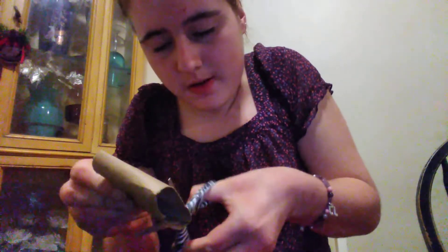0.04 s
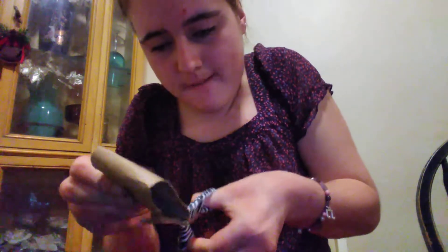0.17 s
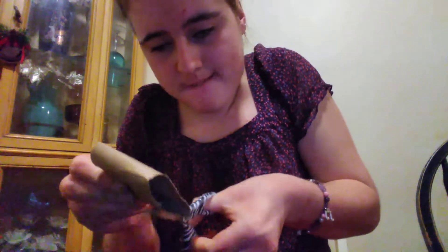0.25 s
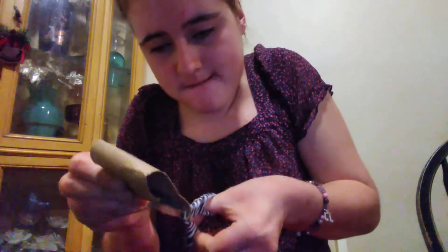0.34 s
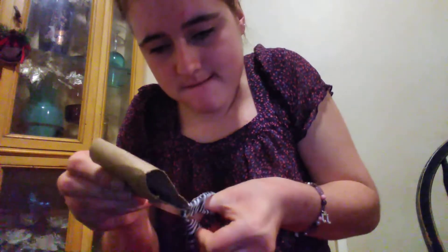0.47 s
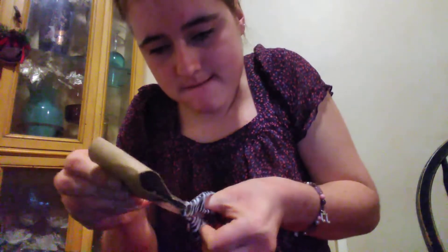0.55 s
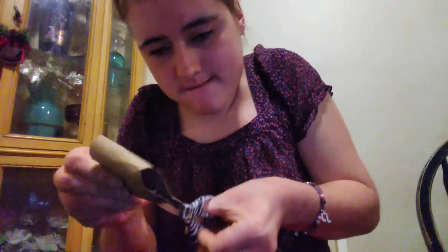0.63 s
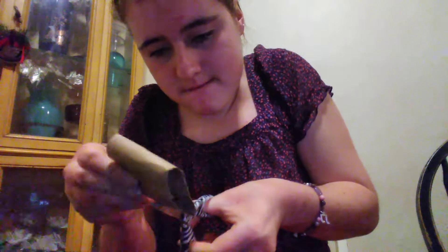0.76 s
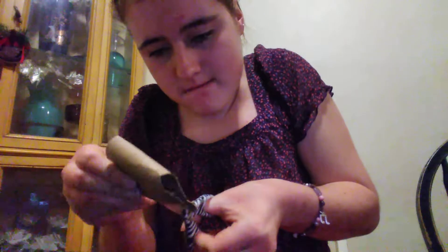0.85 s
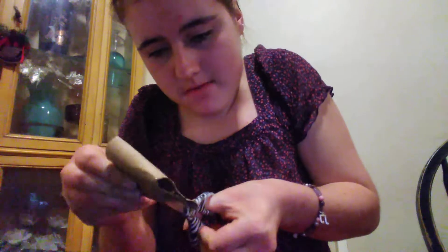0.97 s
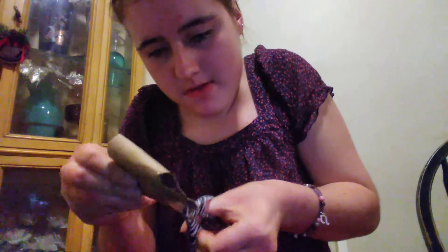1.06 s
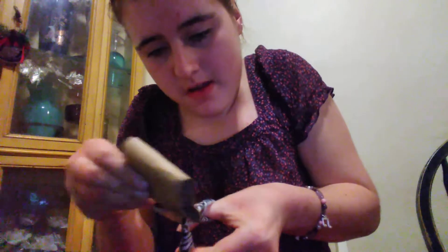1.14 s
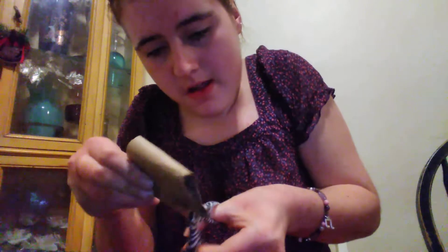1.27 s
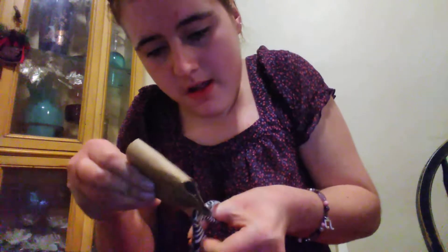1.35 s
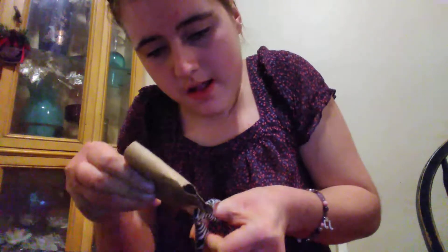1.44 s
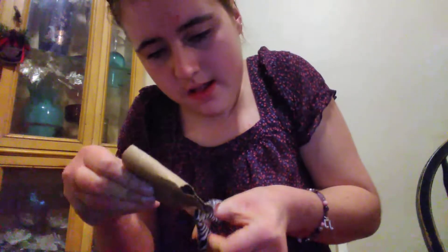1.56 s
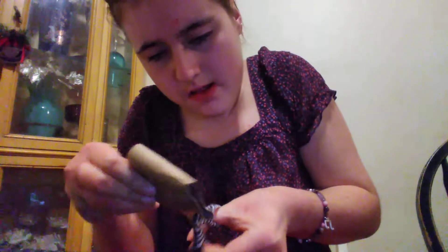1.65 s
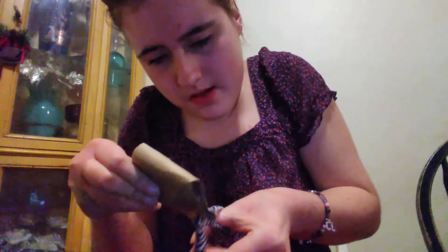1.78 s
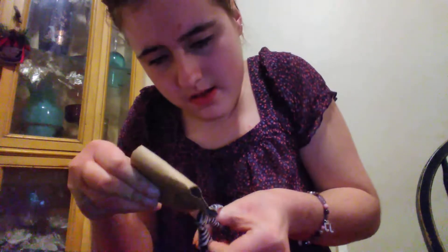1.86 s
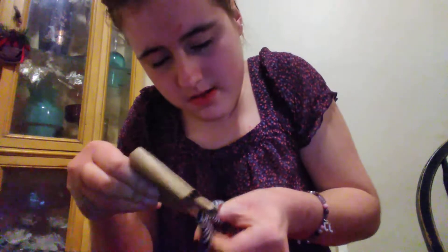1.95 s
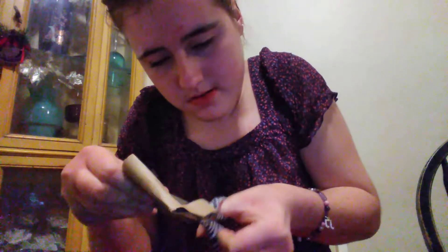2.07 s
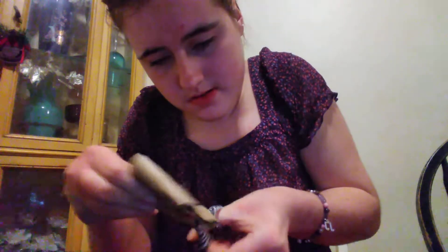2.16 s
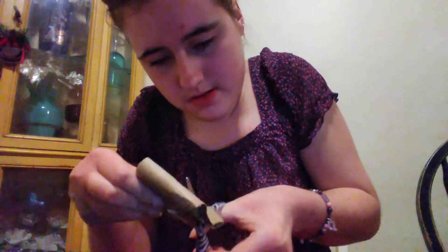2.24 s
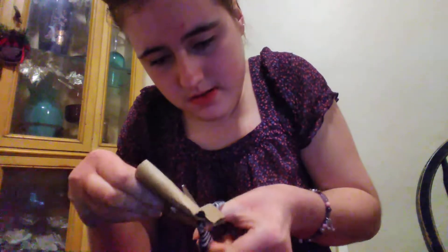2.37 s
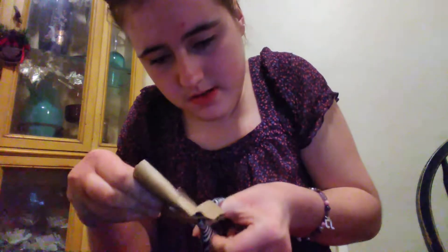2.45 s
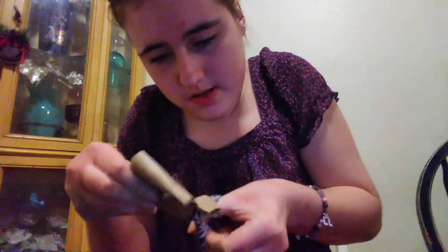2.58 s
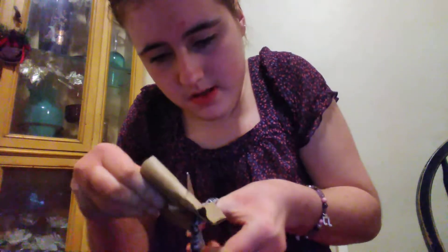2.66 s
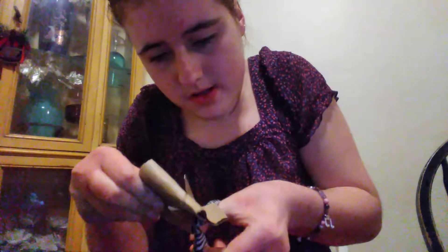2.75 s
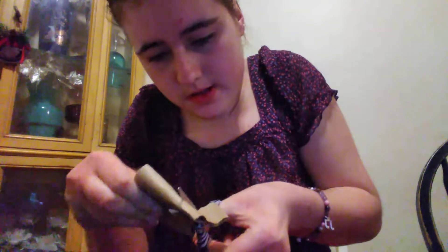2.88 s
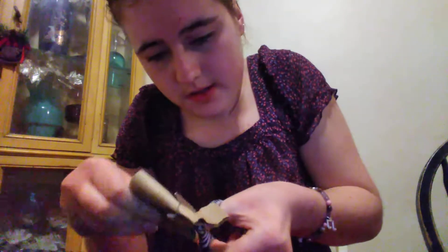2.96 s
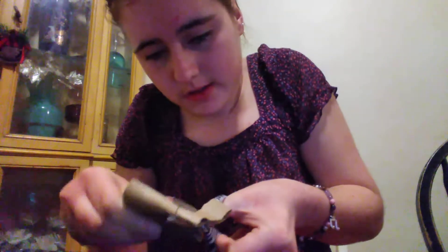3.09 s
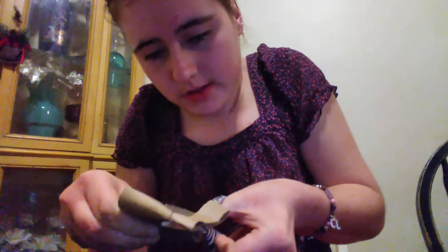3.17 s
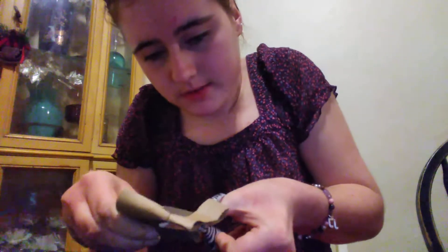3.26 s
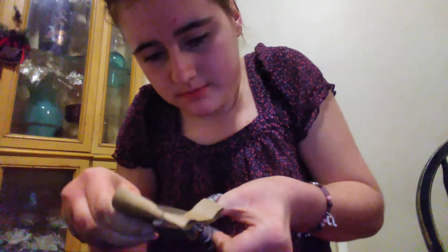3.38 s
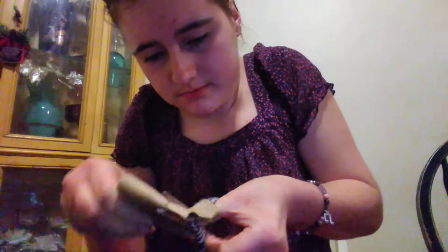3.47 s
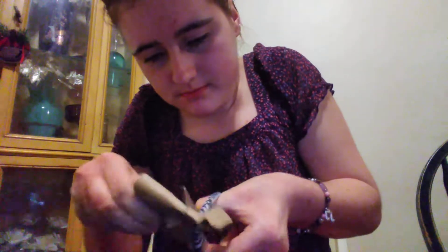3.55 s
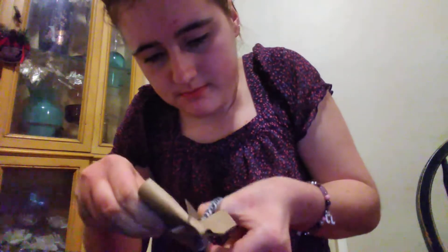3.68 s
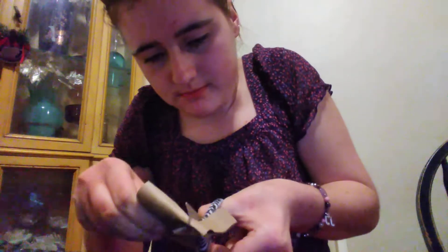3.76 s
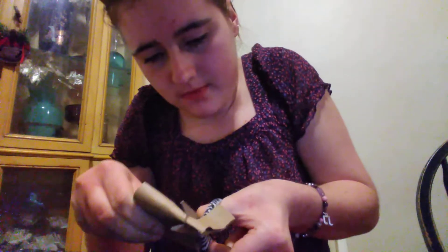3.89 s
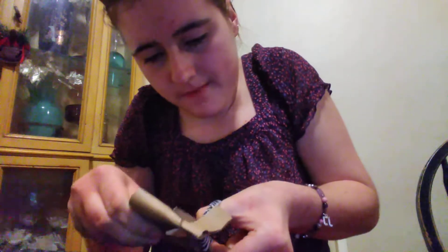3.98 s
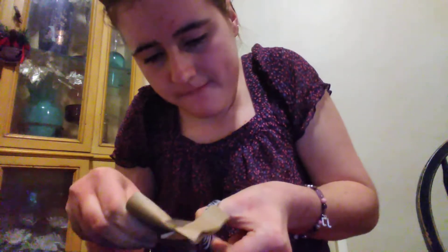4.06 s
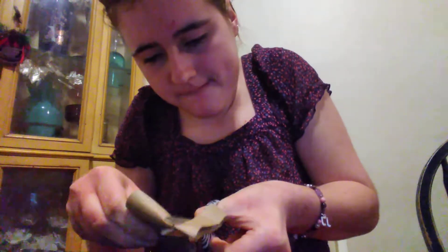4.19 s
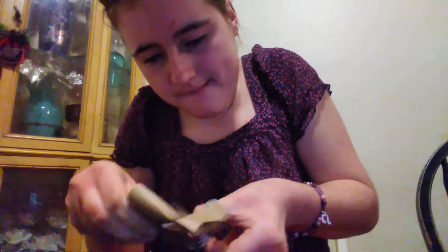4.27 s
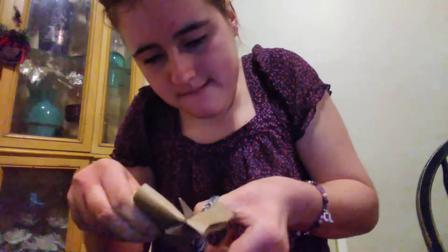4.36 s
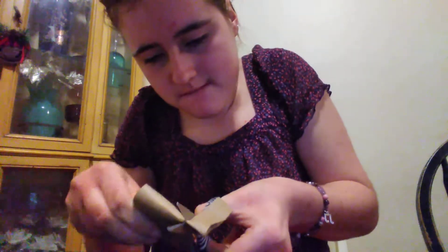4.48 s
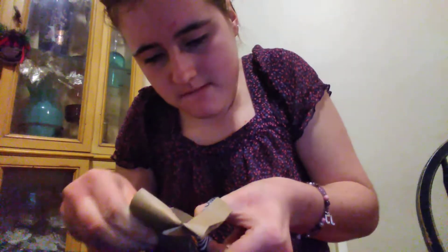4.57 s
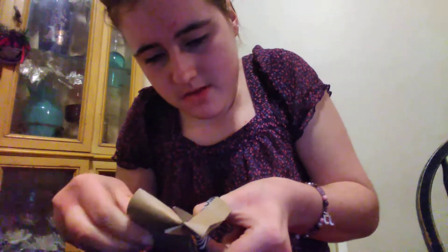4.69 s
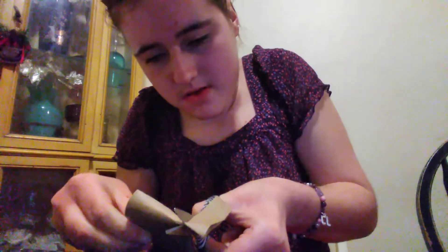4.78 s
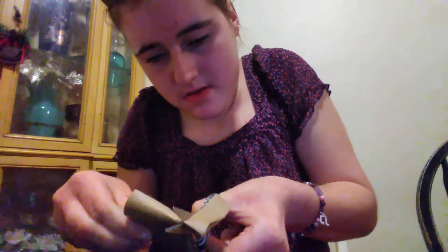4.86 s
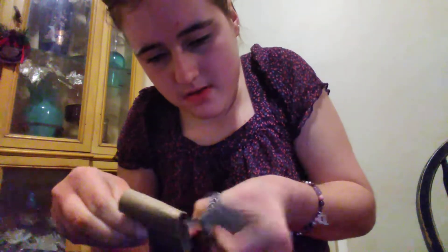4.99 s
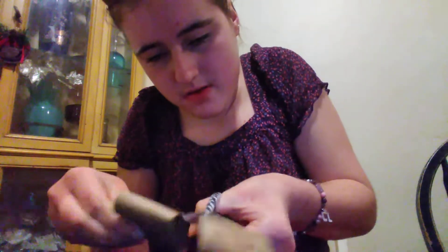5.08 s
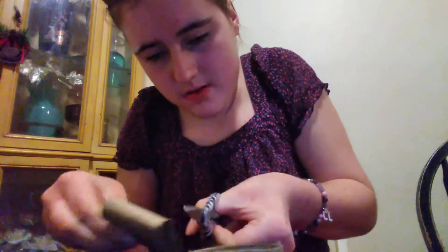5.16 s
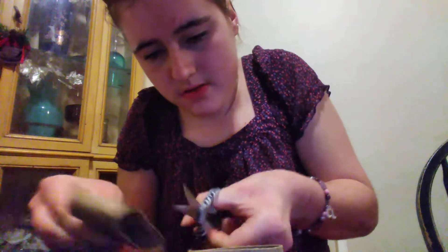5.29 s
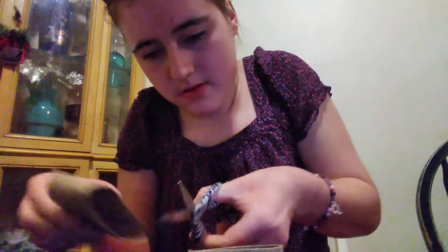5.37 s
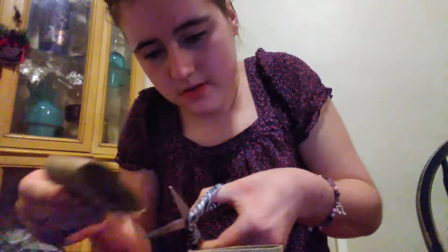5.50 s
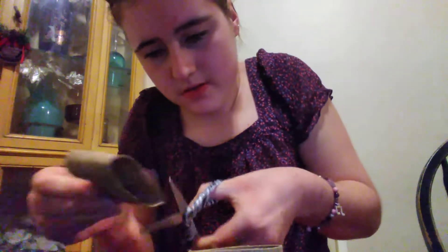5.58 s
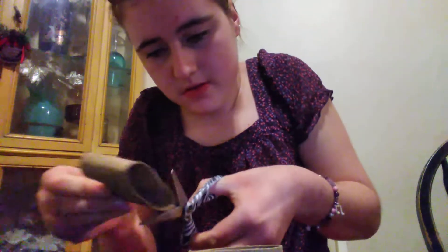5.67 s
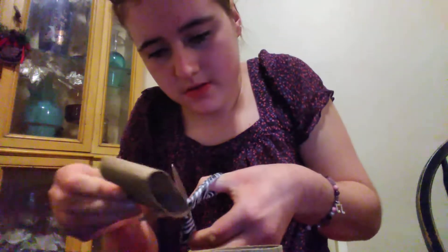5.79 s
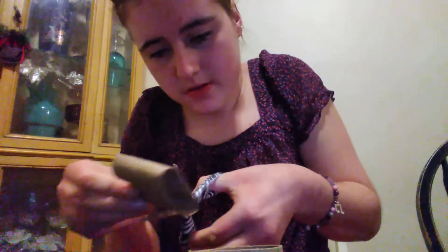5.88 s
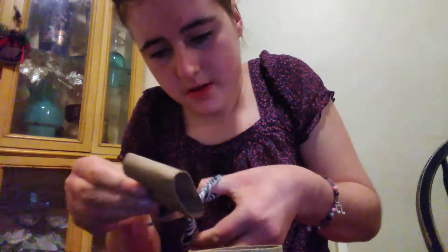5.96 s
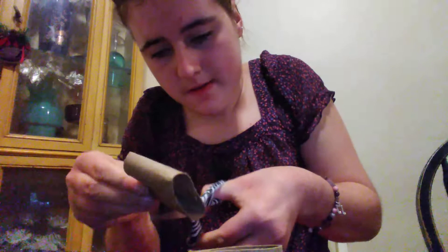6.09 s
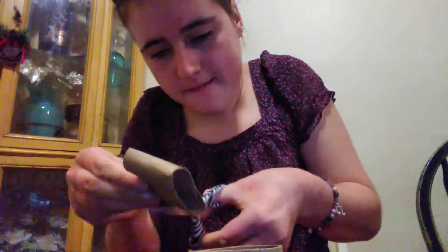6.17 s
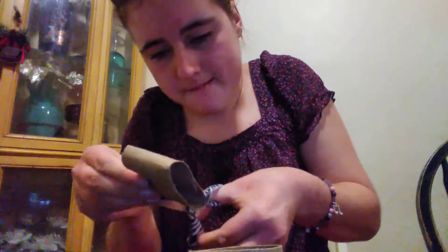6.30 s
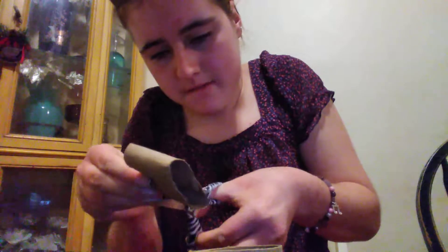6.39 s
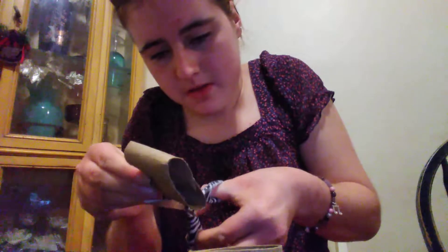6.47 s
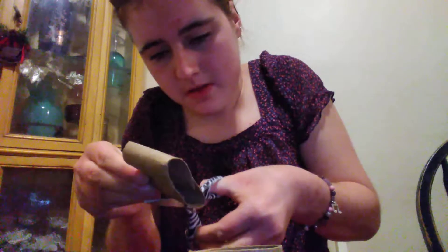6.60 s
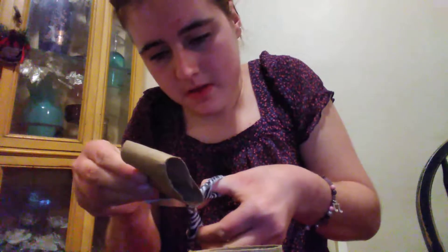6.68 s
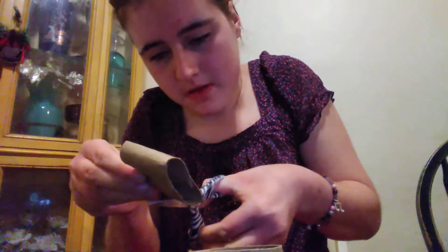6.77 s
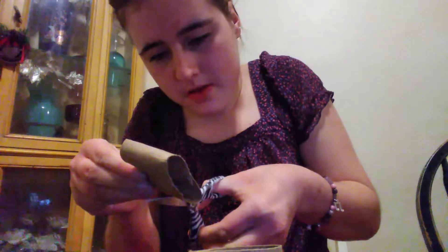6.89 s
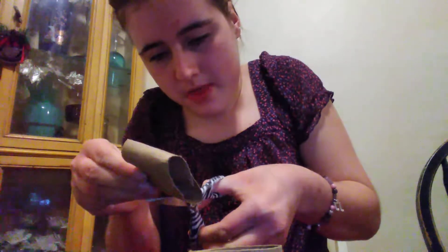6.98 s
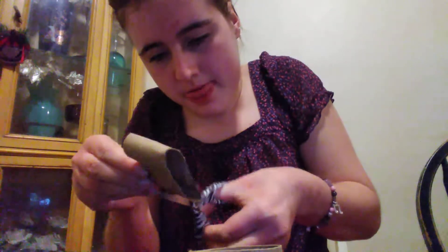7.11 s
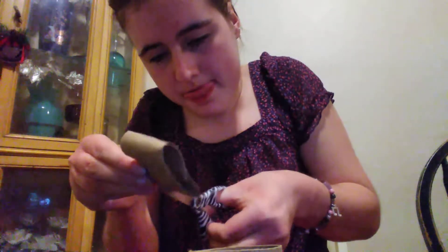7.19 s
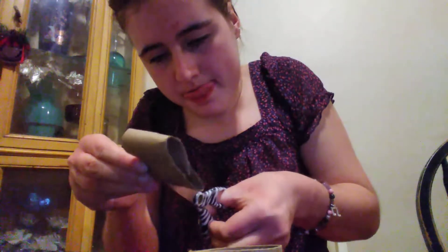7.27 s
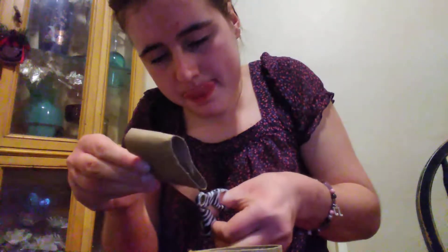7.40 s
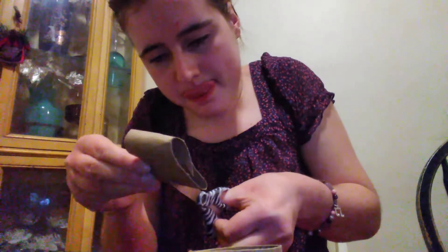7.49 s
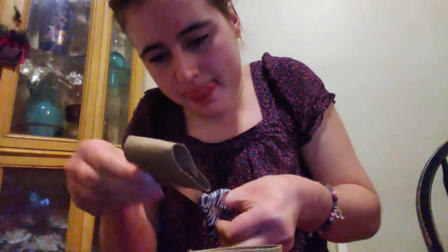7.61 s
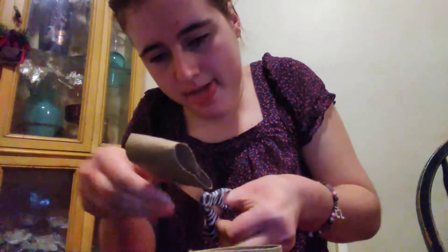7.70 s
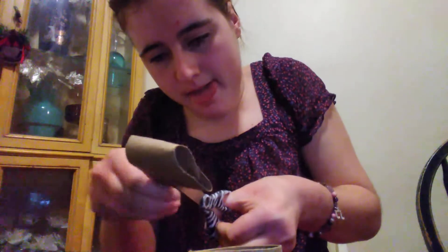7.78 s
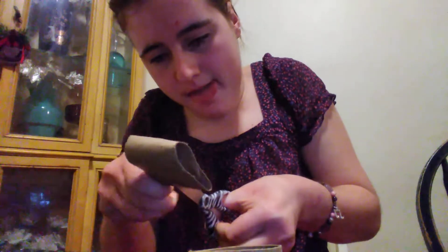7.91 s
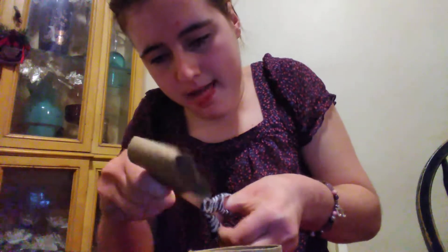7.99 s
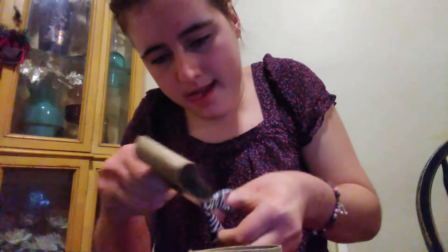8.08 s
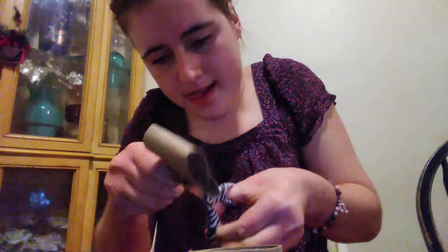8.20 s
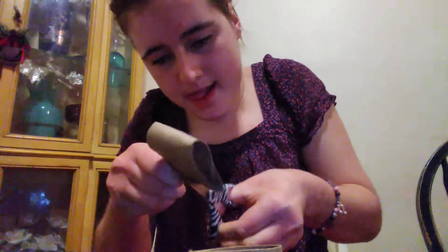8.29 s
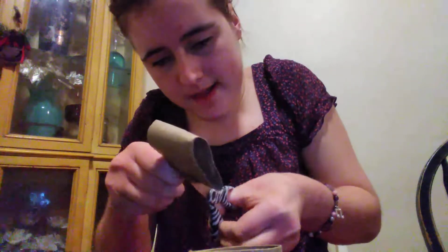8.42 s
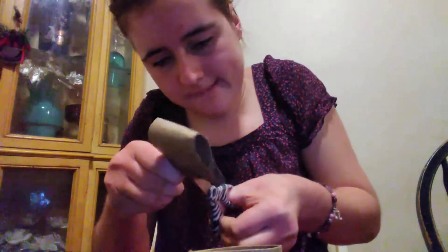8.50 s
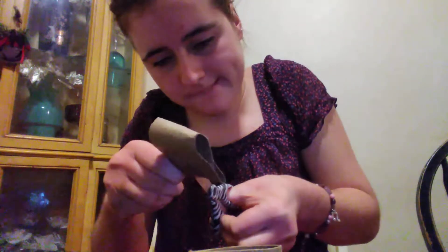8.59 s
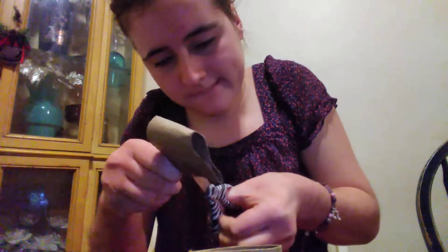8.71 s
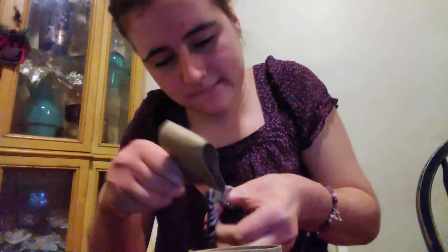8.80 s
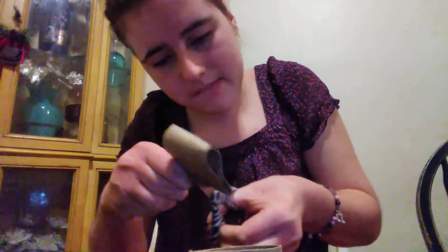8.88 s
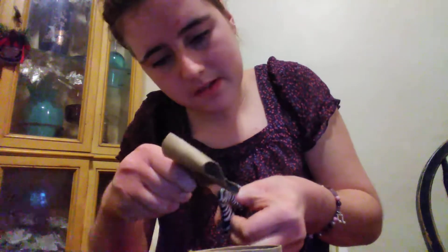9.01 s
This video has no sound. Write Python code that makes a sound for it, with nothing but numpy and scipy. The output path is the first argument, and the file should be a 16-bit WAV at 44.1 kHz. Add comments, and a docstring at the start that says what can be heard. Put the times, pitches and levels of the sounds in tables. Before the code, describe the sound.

Scissors cut a cardboard tube close to the microphone in a quiet room, over a faint murmur of air. From about 0.5 seconds, short snips come in a quick, uneven run, each a dry crackle of tearing fibres, often with a sharp, slightly hollow snap. A strong snap lands at 2 seconds. After 3 seconds the cuts spread out, falling near 3.5, 4, 4.3 and 5 seconds. Fingers and blades slide softly on the cardboard between them. The cutting then stops, and the background drops out in patches until about 5.8 seconds. Faint handling returns, with two softer snips near 6.7 and 7.1 seconds. Another cut comes just after 8 seconds, followed by a louder cluster of crisp crunches from 8.5 to 9 seconds.

```python
"""Scissors chew through a cardboard tube, close to a microphone pair in a quiet room.
Fibres tear in dense crackle and give way in snaps; both ring the modes of the tube.
Hands rustle between cuts over faint room air. The recorder widens the stereo by
cross-feeding, and the sound drops out now and then."""
import sys
import numpy as np
from scipy import signal
from scipy.fft import rfft, irfft
from scipy.io import wavfile
from scipy.ndimage import uniform_filter1d

SR = 44100
rng = np.random.default_rng(int(sys.argv[2]) if len(sys.argv) > 2 else 0)


def wav_out(sig):
    """Save sig, one row per channel (or a flat mono array), as 16-bit PCM at SR to the path in sys.argv[1]."""
    wavfile.write(sys.argv[1], SR, np.round(np.clip(np.atleast_2d(sig).T, -1, 1) * 32767).astype(np.int16))


N = 399105
TIME_S = np.arange(N) / SR
FREQ_HZ = np.fft.rfftfreq(N, 1 / SR)

# Blade squeezes. Each row: bite in seconds, length in ms, tearing at bite and at end in dB,
# body, wall and fibre in dB re tearing, wall focus in Hz, tearing focus in Hz.
SQUEEZES = [(0.530, 43.3, -31, -34.5, -14, -14, -1.5, 1050, 4000),
            (0.697, 41, -37.5, -37, -8.5, -6.5, 5.5, 1420, 5250),
            (0.731, 23, -33, -37, -11.5, -0.5, -4, 1488, 3320),
            (0.851, 8, -51, -57.5, 5.5, 3.5, 13, 1230, 5430),
            (0.909, 24, -27.5, -27, -26, -5, 0, 1380, 4300),
            (1.109, 21, -49, -56, -8, -12, 4.5, 1440, 4750),
            (1.132, 42.7, -30, -34, -11, -7, 1.5, 1480, 4350),
            (1.318, 2, -37.5, -46.5, -1.5, -12, 8.5, 1370, 5400),
            (1.382, 6, -23.5, -30, -12.5, -8.5, 2, 1090, 5100),
            (1.412, 20, -46.5, -40.5, -10, 2, 4, 1450, 4610),
            (1.446, 24, -32, -42.5, -8, 1, -1, 1350, 4620),
            (1.664, 9, -44.5, -41.5, -4.5, -5, 6, 1430, 5180),
            (1.697, 10, -40, -40.5, -10, -5, 3, 1510, 4841),
            (1.971, 20, -25.5, -33.5, -24, 3.5, -1.5, 1080, 4430),
            (2.005, 36, -37.5, -40.5, -14, 3, 1.5, 1280, 4350),
            (2.170, 22, -47.5, -27.5, -10, 4, -2, 1200, 4200),
            (2.200, 32, -37, -44, -17, -8.5, 0.5, 1210, 3950),
            (2.430, 34, -40, -37.5, -11.5, -3, -6, 1660, 4500),
            (2.474, 26, -29.5, -42, -11.5, -0.5, -3.5, 1740, 4350),
            (2.634, 30, -40.5, -38.5, -10, 2, 3, 1270, 4880),
            (2.804, 20.7, -38.5, -42, -8, -4.5, 6.5, 1500, 5260),
            (2.890, 34, -30.5, -52, -2.5, -2.5, 2, 1620, 3530),
            (3.072, 40, -34.5, -49, -8.5, -12.5, 3.5, 850, 5140),
            (3.522, 14, -40.5, -32.5, -10.5, -4.5, 1.5, 1230, 4050),
            (3.538, 33, -28.5, -30.5, -14, -4, -1.5, 1250, 3900),
            (4.042, 11, -32.5, -34, -8, 3, 3.5, 1250, 4890),
            (4.065, 17, -31.5, -35.5, -12.5, -1.5, 4, 1450, 4050),
            (4.296, 22, -35, -30.5, -18, -3.5, 0.5, 1400, 5280),
            (4.322, 42, -31.5, -39, -14, -11, 0, 1370, 5360),
            (4.955, 7.6, -43, -21, -18.5, -6, 5.5, 620, 4800),
            (4.990, 38, -51, -54.5, -5, -3.5, 5.5, 610, 4800),
            (6.690, 27, -59, -63, -7, 1.5, 0, 1400, 3200), (6.726, 2, -41.5, -40, -8, -3, 1.5, 1420, 3240),
            (7.064, 52, -72.5, -57, -5, -8, -3.5, 1208, 3430),
            (7.122, 46.7, -37, -42.5, -2, -7.5, -1.5, 1410, 3550),
            (7.190, 37, -55.5, -71, 4.5, -3, -8.5, 759, 3490),
            (8.072, 47.4, -48, -51, -4, 0.5, 1.5, 1600, 3300),
            (8.140, 160, -62, -67, -3, 3.5, -22, 1600, 3180),
            (8.310, 63, -61.5, -64.5, -16, -9.5, -25, 1340, 2820),
            (8.476, 30.3, -26, -45, -6, 3.5, 0.5, 1210, 3300),
            (8.581, 31.7, -31, -47.5, -5.5, -10, -0.5, 1380, 4900),
            (8.768, 14.3, -38, -27.5, -13, -3, -2.5, 1280, 2970),
            (8.790, 32, -30.5, -39, -13, -10.5, -2.5, 1250, 3120),
            (8.948, 34, -29, -34.5, -12, -6.5, 2, 1250, 4000),
            (8.985, 62, -33, -50.5, -21.5, -9, 0.5, 1260, 4900)]
# The card gives way. Each row: start in seconds, tearing peak in dB,
# body, wall and fibre in dB re tearing, wall focus in Hz, tearing focus in Hz.
CARD_SNAPS = [(0.5267, -26.5, -30, -3, 2.5, 571, 3500), (0.5336, -19, -35, -3, -7, 620, 3300),
              (0.5446, -13, -28, -3.5, -0.5, 1380, 5520), (0.5577, -21.5, -36, -7.5, -9, 650, 4060),
              (0.5676, -19.5, -37, -7.5, -1, 1560, 3560), (0.7324, -23, -40, -16, -23, 1550, 3210),
              (0.9103, -17, -12, -19, 7.5, 1438, 6040), (0.9278, -19, -69, -28, -3.5, 1340, 5200),
              (1.1347, -17.5, -27, -14, -4, 1470, 3980), (1.1644, -26.5, -7, -22, -18, 552, 5040),
              (1.318, -33, -23.5, -6.5, 13, 1470, 5460), (1.3842, -15, -37.5, -9.5, -1, 870, 5510),
              (1.4263, -18, -21.5, -20, -10.5, 1560, 4150), (1.4444, -14.5, -13, -5.5, 1.5, 930, 5150),
              (1.694, -26, -15.5, -7.5, -17, 1710, 5680), (1.9692, -6.5, -17, 2, -9, 930, 3990),
              (1.9819, -9, -43.5, 1, -1.5, 1580, 5130), (2.027, -29, -29, -25, 2, 1600, 3170),
              (2.1912, -35, -43, -0.5, 2, 1247, 5290), (2.4321, -17, -21, -0.5, -6.5, 1550, 4050),
              (2.4737, -19, -23, 2.5, 3, 1784, 5080), (2.6531, -25.5, -13, 3.5, -5, 1100, 5600),
              (2.8176, -23, -19, -23, 1, 1517, 5240), (2.887, -19, -21, 0, 3.5, 1650, 3110),
              (3.0715, -18, -27, -17, -2.5, 628, 5400), (3.5345, -28.5, -29, 7, -17, 1170, 3170),
              (3.5475, -33, -33, 8.5, -15, 1310, 3183), (4.04, -11.5, -28, 0, 0.5, 1270, 5230),
              (4.07, -27, -21.5, -5, -18.5, 1367, 3640), (4.312, -21, -35.5, -19.5, -14.5, 1090, 5560),
              (4.9683, -11, 0.5, -4, -7, 558.6, 5610), (6.7236, -40, -33, 3, -15, 1380, 3000),
              (7.1229, -35.5, -30, -3.5, -8, 1486, 2930), (8.0598, -25.5, -15, 7, -20.5, 1804, 2990),
              (8.0852, -33, -32.5, 13, -23, 1730, 3360), (8.4741, -14, -32, 5.5, -11, 1150, 2760),
              (8.4836, -15.5, -13, 0.7, 0, 740, 3250), (8.579, -26, -33, 5.5, -16, 1630, 5100),
              (8.7743, -19.5, -45, -1, -12, 1430, 2800), (8.952, -15.5, -21.5, -2.5, 6.5, 1250, 2700),
              (8.9754, -7.5, -29, -6, 5.5, 1030, 5420)]
# Tube and blade modes in four groups: hollow body, wall, tearing, fine fibre.
# Each row: frequency in Hz, width in Hz, level in dB.
MODE_GROUPS = [
    [(69.5, 11, -24), (140, 32, -21), (227, 96, -12.5), (306, 130, -6.5), (464.4, 120, -4)],
    [(612, 110, -6.5), (751.5, 170, -5.5), (937, 180, -5), (1254, 240, 0.5), (1435, 230, 0.5),
     (1738, 230, 1.5)],
    [(2476, 350, 4), (3022, 380, 2), (3510, 270, -4), (4057, 800, -0.5), (4870, 800, -2.5), (5204, 700, 1)],
    [(6120, 770, -3), (7200, 930, -1), (10140, 2400, -1), (11980, 2400, -2), (13800, 3900, -7.5)],
]


def undb(db):
    return 10 ** (np.asarray(db) / 20)


def walk(rate_hz):
    """Smoothed random steps, spread near 1."""
    hold = int(SR / rate_hz)
    steps = np.repeat(rng.standard_normal(N // hold + 1), hold)
    return 1.3 * uniform_filter1d(uniform_filter1d(steps, hold), hold)[:N]


def crackle(scatter_db, grain_s):
    """Uneven grain gains, rms 1."""
    hold = max(int(grain_s * SR), 1)
    grain_db = scatter_db * np.minimum(rng.exponential(size=N // hold + 1), 3)
    gain = np.repeat(undb(grain_db), hold)[:N]
    return gain / np.sqrt(np.mean(gain ** 2))


def swell(start_s, end_s, start_db, end_db, rise_db_per_s, fall_db_per_s):
    """Gain that climbs to start_db, slides to end_db and falls away."""
    knots_s = [start_s - 60 / rise_db_per_s, start_s, end_s, end_s + 60 / fall_db_per_s]
    knots_db = [start_db - 60, start_db, end_db, end_db - 59.5]
    return undb(np.interp(TIME_S, knots_s, knots_db, left=-200, right=-200))


def capsules(spectra, diffuse):
    """Two unrelated spectra to stereo; treble reaches the right capsule round the housing."""
    # Right capsule re left. Each row: frequency in Hz, coherence 0-1, gain in dB, lag in radians.
    response = [(40, 0.94, -2.17, -2), (125, 0.87, -2.7, 0), (250, 0.9, -3, 0.15), (690, 0.7, -9.5, 0.23),
                (1693, 0.1, -4, -6.5), (2950, 1, 2.5, 2.03), (3933, 0.6, -0.7, 1.5), (5000, 0.02, 3, -0.3),
                (14600, 0, -0.9, 37)]
    hz, *columns = np.transpose(response)
    coherence, db, lag_rad = (np.interp(FREQ_HZ, hz, column) for column in columns)
    coherence = np.clip(coherence, 0, 1) / (1 + diffuse * (FREQ_HZ / 1450) ** 2)
    left, unrelated = spectra
    right = coherence * np.exp(-1j * lag_rad) * left + np.sqrt(1 - coherence ** 2) * unrelated
    return irfft(np.array([left, undb(db) * right]), N)


def hiss(colour):
    """Diffuse coloured noise at both capsules, rms 1."""
    hz, db = np.transpose(colour)
    gain = undb(np.interp(np.log(FREQ_HZ + 1), np.log(hz), db))
    noise = capsules(rfft(rng.standard_normal((2, N))) * gain, diffuse=True)
    return noise / np.std(noise)


def room_air():
    """Low murmur of air, wavering slightly."""
    # Air spectrum. Each row: frequency in Hz, relative density in dB.
    colour = [(40, -9), (110, -2), (220, 2.5), (400, -4), (470, 4.5), (560, -6.5), (1100, -9),
              (2200, -17.5), (5000, -24), (9000, -26.5), (14000, -27.5)]
    return hiss(colour) * undb(-66.5 + .9 * walk(rate_hz=5.9))


def flicker(per_s, length_s, depth_db):
    """Gain with brief dips at random moments."""
    hits = (rng.random(N) < per_s / SR).astype(float)
    dips = signal.fftconvolve(hits, np.hanning(int(length_s * SR)), "same")
    return undb(depth_db * np.minimum(dips, 1))


def room(direct, t60_s, tail_db):
    """Adds a short, thin diffuse tail, separate for each capsule."""
    t = np.arange(int(.3 * SR)) / SR
    tail = rng.standard_normal((2, len(t))) * np.exp(-np.log(1000) * t / t60_s) * (t > .003)
    tail = signal.lfilter(*signal.butter(2, 800., "high", fs=SR), tail)
    tail /= np.sqrt(np.sum(tail ** 2, axis=1, keepdims=True))
    return direct + undb(tail_db) * signal.fftconvolve(direct, tail, axes=1)[:, :N]


def rustle():
    """Fingers and blades slide on the card; the grip shifts after every squeeze."""
    # Slides. Each row: peak time in seconds, level in dB, fade in dB per second.
    slides = [(0.108, -64.5, 30), (1.826, -52, 330), (2.344, -67.5, 72.5), (2.755, -60, 100),
              (3.300, -66.5, 120), (3.462, -66, 249), (3.796, -66, 181.5), (3.974, -59.5, 182),
              (4.436, -57, 169), (4.700, -72, 90), (5.138, -57.5, 901), (5.940, -69.5, 200),
              (6.262, -69, 41), (7.055, -73, 59.5), (7.400, -77, 60), (7.600, -63.5, 66),
              (7.950, -70.5, 27), (8.850, -60.5, 37)]
    # Friction spectrum. Each row: frequency in Hz, relative density in dB.
    colour = [(1500, -8), (3500, -9), (5500, 0.27), (7000, -1), (9500, -3.5), (12500, -4.5), (15000, -5.5)]
    grip_db, grip_fall_db_per_s, rise_db_per_s, resting_db = -65, 58, 1201, -86.5
    grips = [(s + ms / 1000, grip_db, grip_fall_db_per_s) for s, ms, *_ in SQUEEZES]
    swells = [swell(s, s, db, db, rise_db_per_s, fall) for s, db, fall in slides + grips]
    level = np.max(swells, axis=0) + undb(resting_db)
    return hiss(colour) * level * undb(2.2 * walk(rate_hz=41)) * crackle(0.92, grain_s=.0022)


def ring(drive, hz, width_hz):
    """One mode: a resonator applied twice, keeping the rms of white noise."""
    b, a = signal.iirpeak(hz, hz / width_hz, SR)
    return signal.lfilter(b, a, signal.lfilter(b, a, drive)) * np.sqrt(2 * SR / np.pi / width_hz)


def shares(modes, focus_hz, db_per_octave=-13.5):
    """Mode gains, total power 1; the piece under the blades favours modes near the focus."""
    hz, _, db = np.transpose(modes)[:, :, None]
    if focus_hz is not None:
        db = db + db_per_octave * abs(np.log2(hz / focus_hz))
    gain = undb(db)
    return gain / np.sqrt(np.sum(gain ** 2, axis=0))


def travel(mid_hz, octaves_per_s):
    """Focus in Hz, gliding as the blades travel through each squeeze."""
    bite_s, length_ms = np.transpose(SQUEEZES)[:2]
    half_glide = 2 ** (octaves_per_s * length_ms / 2000)
    knots_s = np.ravel([bite_s, bite_s + length_ms / 1000], "F")
    knots_hz = np.ravel([mid_hz / half_glide, mid_hz * half_glide], "F")
    return np.interp(TIME_S, knots_s, knots_hz)


def dip_at_snaps(length_s, depth_db):
    """The tearing dips briefly at each snap, so the snap sounds crisp."""
    gain_db, size = np.zeros(N), int(length_s * SR)
    for start_s, *_ in CARD_SNAPS:
        end = int(start_s * SR) + size // 3
        gain_db[end - size:end] += depth_db * np.hanning(size)
    return undb(gain_db)


def tearing():
    """Dense fibre breaks ring the modes while the blades close."""
    power = np.zeros((4, N))
    for s, ms, bite_db, end_db, body_db, wall_db, fibre_db, *_ in SQUEEZES:
        envelope = swell(s, s + ms / 1000, bite_db, end_db, rise_db_per_s=2799.5, fall_db_per_s=800)
        power += np.outer(undb([body_db, wall_db, 0, fibre_db]), envelope) ** 2
    breaks = rng.standard_normal((2, N)) * crackle(2.8, grain_s=.0012) * crackle(0.9, grain_s=.006)
    breaks *= dip_at_snaps(length_s=.012, depth_db=-7)
    *_, wall_hz, tear_hz = np.transpose(SQUEEZES)
    foci_hz = None, travel(wall_hz, octaves_per_s=1.2), travel(tear_hz, octaves_per_s=-1.4), None
    out = np.zeros((2, N))
    for force, modes, focus_hz in zip(np.sqrt(power), MODE_GROUPS, foci_hz):
        for (hz, width_hz, _), share in zip(modes, shares(modes, focus_hz)):
            out += ring(breaks * force * share * undb(2.2 * walk(rate_hz=17)), hz, width_hz)
    return out


def snaps():
    """The card gives way: rough jolts of a few ms leave the modes ringing."""
    start_s, peak_db, body_db, wall_db, fibre_db, wall_hz, tear_hz = np.transpose(CARD_SNAPS)
    size = SR // 16
    damping = 1.6  # a snap grips the card: wider, shorter modes
    jolt_ms = 0.7 * undb(0.17 * (peak_db[:, None] + 20.5))  # harder jolts last longer
    age = np.arange(size) / SR * 1000 / jolt_ms
    noise = rng.standard_normal((len(start_s), 2, size)).transpose(1, 0, 2)
    jolts = noise * (1 - np.exp(-5.0 * age)) * np.exp(-.6 * age)
    groups_db, foci_hz = (body_db, wall_db, 0, fibre_db), (None, wall_hz, tear_hz, None)
    bursts = np.zeros_like(jolts)
    for group_db, modes, focus_hz in zip(groups_db, MODE_GROUPS, foci_hz):
        rung = np.zeros_like(jolts)
        for (hz, width_hz, _), share in zip(modes, shares(modes, focus_hz)):
            rung += share[:, None] * ring(jolts, hz, min(damping * width_hz, hz))
        bursts += rung / abs(rung).max(axis=2, keepdims=True) * undb(peak_db + group_db)[:, None]
    out = np.zeros((2, N + size))
    for k, start in enumerate((start_s * SR).astype(int)):
        out[:, start:start + size] += bursts[:, k]
    return out[:, :N]


def scene():
    """Cutting in the room, over flickering rustle and air."""
    tube = capsules(rfft(tearing() + snaps()), diffuse=False)
    background = rustle() + room_air()
    cutting = room(tube, t60_s=0.08, tail_db=-15)
    return cutting + background * flicker(per_s=9.5, length_s=0.009, depth_db=-19)


def record(dry):
    """Treble roll-off, cross-feed, dropouts, soft clipping, steep low-pass."""
    # The sound sinks. Each row: start in seconds, end in seconds, gain in dB.
    dips = [(0.057, 0.104, -21), (2.092, 2.158, -8), (2.27, 2.335, -7.5), (5.066, 5.758, -9)]
    # The sound drops out. Each row: start in seconds, end in seconds.
    mutes = [(-.1, .056), (2.115, 2.158), (5.078, 5.136), (5.144, 5.268), (5.31, 5.366), (5.391, 5.551),
             (5.561, 5.58), (5.622, 5.758)]
    mic_hz, top_hz = 13800, 14250
    cross_gain, cross_delay_s, cross_hz = 0.82, 0.0004338, 5170
    mute_db, ceiling, dc_offset = -54, .95, -.00008
    sides = rfft(dry) / (1 + (FREQ_HZ / mic_hz) ** 6)
    # each side gets the other late, dulled and inverted
    cross = cross_gain * np.exp(-2j * np.pi * FREQ_HZ * cross_delay_s) / (1 + (FREQ_HZ / cross_hz) ** 4)
    wide = irfft(sides - cross * sides[::-1], N)
    gain = np.ones(N)
    for start_s, end_s, db in dips + [(*span, mute_db) for span in mutes]:
        gain[(TIME_S >= start_s) & (TIME_S < end_s)] = undb(db)
    wide *= uniform_filter1d(gain, size=130)
    rounded = ceiling * np.tanh(wide / ceiling) + dc_offset  # soft clipping rounds the loudest snaps
    return signal.sosfilt(signal.ellip(8, .2, 80, top_hz, fs=SR, output="sos"), rounded)


dry = scene()
out = record(dry)
wav_out(out)
```